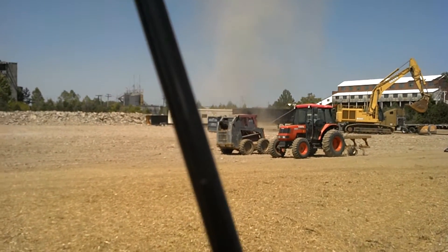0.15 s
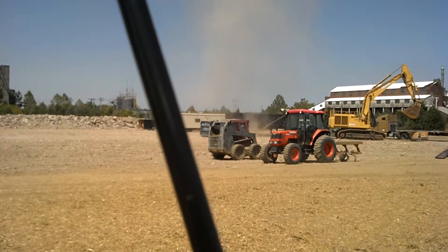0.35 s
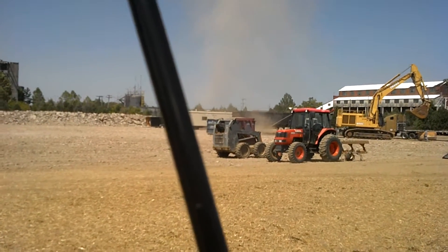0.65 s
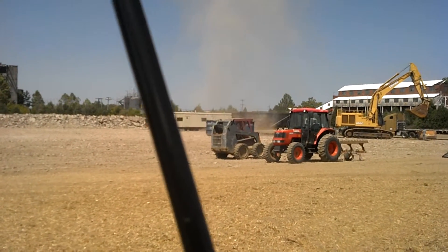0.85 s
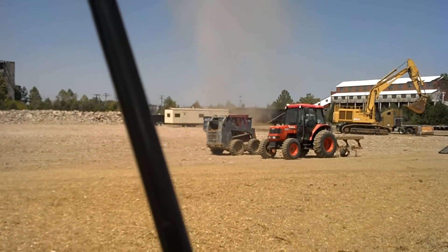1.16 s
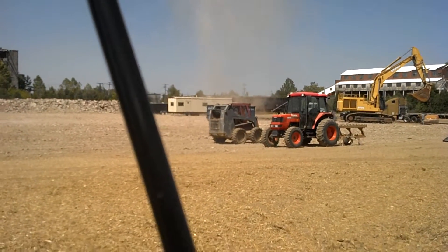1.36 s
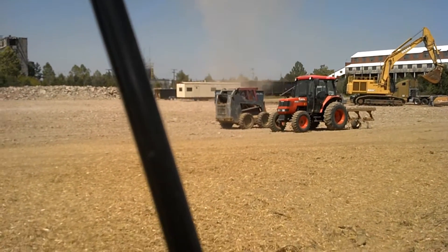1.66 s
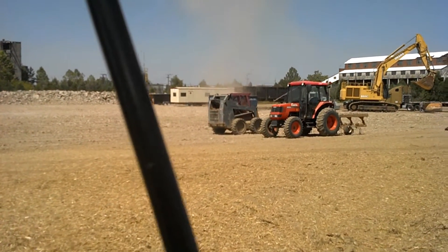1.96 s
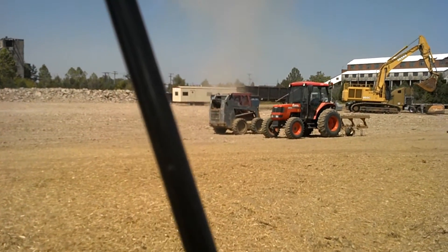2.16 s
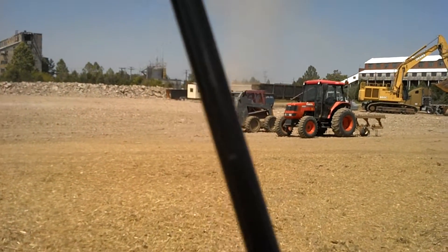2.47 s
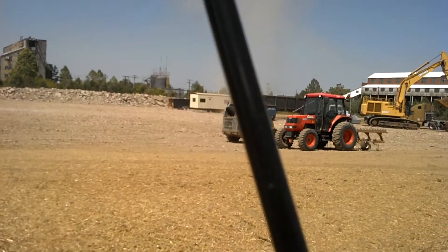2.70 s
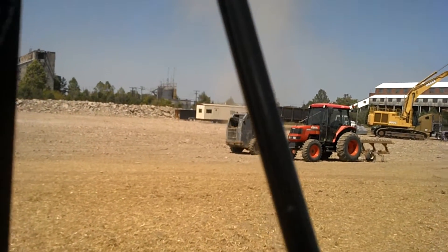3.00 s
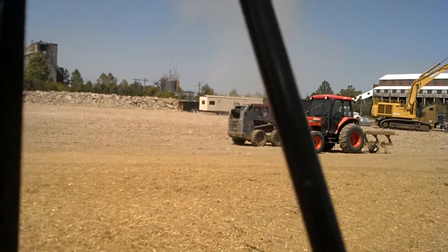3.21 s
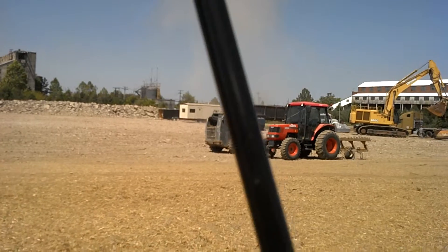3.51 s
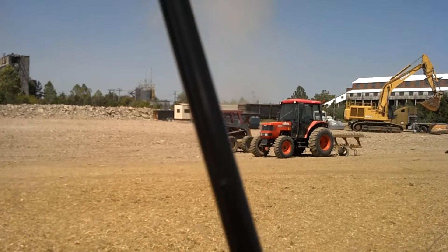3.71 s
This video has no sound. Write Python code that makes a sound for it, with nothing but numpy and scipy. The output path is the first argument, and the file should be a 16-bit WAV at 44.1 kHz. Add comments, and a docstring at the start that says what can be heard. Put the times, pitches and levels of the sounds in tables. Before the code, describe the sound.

A heavy machine's engine runs close by on the left, its hum, low throb and broad roar growing louder over the first two seconds, then holding. From about 1.5 seconds a hiss swells and sinks over a light rattle and a faint distant drone. Wind thumps the microphone a few times, hardest near 1.7 seconds. A second machine whines up and down on the right, clearest from 2.3 to 3.5 seconds.

```python
"""Engine on a dusty lot

An engine fades up close by on the left of an open lot: a clean hum and a low throb over a broad roar.
Its hiss swells and sinks with the load; its treble is flipped and slightly late on the right.
A steady drone sounds far off, a second machine whines up and down on the right,
and wind thumps the microphone."""
import sys
import numpy as np
from scipy import signal
from scipy.fft import rfft, irfft, next_fast_len
from scipy.io import wavfile
from scipy.ndimage import uniform_filter1d, map_coordinates

SR = 44100
rng = np.random.default_rng(int(sys.argv[2]) if len(sys.argv) > 2 else 0)


def file_out(sig):
    """Save sig as 16-bit WAV at sys.argv[1]."""
    # one column per channel
    cols = np.atleast_2d(sig).T
    # limit, then scale
    lim = np.clip(cols, -1, 1)
    pcm = np.round(lim * 32767).astype(np.int16)
    wavfile.write(sys.argv[1], SR, pcm)


N = 169785

# How the engine's noises swell: (time [s], roar gain [dB], bass gain [dB], hiss gain [dB])
ENGINE_GAINS = [(0, -50, -50, -66), (.3, -47, -44, -67.5), (.7, -44, -41.5, -60.5),
                (.95, -41, -44.5, -61.5), (1.2, -38.5, -35.5, -57.5), (1.47, -37, -40, -54),
                (1.58, -35.5, -34, -46), (1.74, -35.5, -33.5, -47.5), (2.08, -31.5, -36.5, -41.5),
                (2.18, -33.5, -30, -44), (2.3, -32.5, -34, -41), (2.56, -33, -33, -40.5),
                (2.66, -34.5, -33.5, -44.5), (3.05, -32.5, -36.5, -40.5), (3.2, -33, -32, -44),
                (3.28, -36.5, -35, -47), (3.42, -32.5, -31, -47.5), (3.56, -35, -36.5, -51),
                (3.63, -33, -38, -47), (3.75, -33.5, -33, -46), (3.82, -33, -33, -40.5)]
# The engine's note: (time [s], pitch [Hz], left level [dB], left level an octave up [dB])
ENGINE_NOTE = [(0, 235.5, -44, -48), (.15, 238.8, -37, -48.5), (.35, 236.4, -36.5, -46),
               (.75, 236, -35, -46.5), (1.05, 238.2, -29.5, -41.5), (1.35, 238.6, -28, -37.5),
               (1.55, 236.9, -23, -36), (1.73, 234, -40, -43), (1.9, 233.2, -21.5, -42),
               (2.05, 234.7, -29.5, -36.5), (2.35, 235.7, -24.5, -31), (2.47, 234.3, -31, -33),
               (2.65, 233.7, -42, -44), (2.78, 233.7, -30, -41.5), (3.1, 235.5, -23, -37.5),
               (3.25, 236.4, -25.5, -39.5), (3.45, 237.2, -29, -32.5), (3.64, 236.7, -33.5, -36.5),
               (3.75, 236.7, -21, -45), (3.85, 234, -35, -51)]


def amp(db):
    return 10 ** (np.asarray(db) / 20)


def unit_rms(x):
    return x / np.sqrt(np.mean(x ** 2) + 1e-20)


def over_frequency(rows, hz):
    """Join a table's rows into curves along a log frequency axis."""
    row_hz, *columns = np.transpose(rows)
    return [np.interp(np.log(hz + 1), np.log(row_hz + 1), c) for c in columns]


def over_time(rows):
    """Join a table's rows into curves with one value per sample."""
    times, *columns = np.transpose(rows)
    return [np.interp(np.arange(N) / SR, times, c) for c in columns]


def wobble(rate):
    """A smooth curve through `rate` random points a second."""
    return map_coordinates(rng.standard_normal(int(N * rate / SR) + 4), [np.arange(N) * rate / SR])


def noise_pair(patchy_db):
    """Spectra of two noises with the same loud and soft patches, and their frequencies."""
    cells = signal.stft(rng.standard_normal((2, N)), nperseg=512)[2]
    patches = uniform_filter1d(rng.standard_normal(cells.shape[1:]), size=8, axis=0)
    patches = uniform_filter1d(patches, size=12, axis=1)
    pair = signal.istft(cells * amp(patchy_db * unit_rms(patches)), nperseg=512)[1][:, :N]
    return *rfft(pair), np.fft.rfftfreq(N, 1 / SR)


def tone(hz, waver_db, rate=12):
    """A pure tone that follows a pitch curve and wavers in level."""
    cycles = np.cumsum(hz) / SR
    return np.sqrt(2) * amp(waver_db * wobble(rate)) * np.sin(2 * np.pi * (cycles + rng.random()))


def wide_noise(spectrum, patchy_db, late_s=17 / SR, alike_top_hz=14970):
    """Noise as if flipped and late on the right: its bands are by turns alike and opposite."""
    # How bands take turns: (frequency [Hz], firmness, hand-over exponent, link between the parts [0-1])
    band_turns = [(1500, 1.07, 0.11, 0.1), (2120, 1.253, 0.37, 0), (2615, 1.03, 0.42, .2),
                  (3080, 1.38, 0.12, 0.5), (4300, 1.11, 1, 0.5), (6800, 1.32, 0.24, .3),
                  (15000, 1.29, 0.27, .3)]
    a, b, hz = noise_pair(patchy_db)
    lag = 2 * np.pi * hz * late_s
    firmness, handover, link = over_frequency(band_turns, hz)
    share = np.clip(.5 - firmness * np.cos(lag) / 2, 0, 1) * (hz < alike_top_hz)
    alike, opposite = share ** handover, (1 - share) ** handover
    gain = amp(over_frequency(spectrum, hz)[0]) / np.hypot(alike, opposite)
    mid = alike * a
    side = opposite * (-1j * np.sign(np.sin(lag)) * link * a + np.sqrt(1 - link ** 2) * b)
    return unit_rms(irfft(gain * np.array([mid + side, mid - side]), N))


def hum(hz, hum_db, octave_db):
    """The engine's clean note and its octave, mostly on the left."""
    note = amp(hum_db) * tone(hz, waver_db=1.5, rate=20) * [[1], [-amp(-19)]]
    octave = amp(octave_db) * tone(2 * hz, waver_db=1.5) * [[1], [amp(-12.5)]]
    return note + octave


def engine_orders(cycle_hz):
    """Fainter tones at whole multiples of the rate at which the engine repeats its cycle."""
    # The tones: (multiple, left gain [dB], right gain [dB], waver [dB])
    orders = [(15, -9, -22, 2.5), (18, -31, -32, 3), (20, -17, -34, 6), (21, -18.5, -27, -3),
              (30, -16, -18.5, 2), (36, -14.5, -28, 2.5)]
    return sum(amp([[left], [right]]) * tone(k * cycle_hz, waver) for k, left, right, waver in orders)


def far_drone(hz=200.5):
    """A distant tone that holds nearly one pitch."""
    return amp([[-12], [-9]]) * tone(hz + 0.59 * wobble(4.6), waver_db=2.5)


def throb(cycle_hz):
    """A low tone at eight times the engine's cycle rate, coming in uneven surges."""
    # The surges: (time [s], gain [dB])
    surges = [(0.0, -48), (0.17, -65), (0.39, -42.5), (0.59, -47.5), (0.67, -33), (0.74, -56), (0.87, -40),
              (1.16, -47), (1.31, -35), (1.34, -49), (1.5, -33), (1.88, -40), (1.91, -54), (2.05, -34),
              (2.09, -45), (2.14, -32), (2.41, -39.5), (2.58, -31.5), (2.63, -42), (2.85, -32.5),
              (2.89, -46), (3.11, -26), (3.18, -38.5), (3.59, -31), (3.74, -42), (3.81, -30.5), (3.85, -47)]
    return amp(over_time(surges)[0]) * amp([[.5], [-4.5]]) * tone(8 * cycle_hz, waver_db=3, rate=24)


def roar(roar_db, bass_db, split_hz=186, gain_db=1.5):
    """The engine's broad, low noise: the bass shakes and the upper part flutters lightly."""
    # Tone colour: (frequency [Hz], left gain [dB], right gain [dB], likeness [0-1], right lead [rad])
    spectrum = [(20, -81, -83, .85, 3), (40, -70, -73, .85, 2.9), (62, -63, -67, .85, 2.8),
                (85, -54, -59, .75, 2.6), (125, -54, -56, .6, 2.8), (140, -53, -56, .6, 2),
                (156, -50, -53, .75, 1), (185, -53, -59, .3, 1.5), (212, -57, -57, .3, 1.5),
                (270, -55, -53, .3, 2), (305, -58, -55, .4, 1.2), (340, -62, -55, .3, .3),
                (420, -59, -57, .4, 0), (560, -65, -62, .45, -.4), (680, -65.5, -64, .45, -.2),
                (850, -70.5, -66, .45, 0), (1020, -72, -68, .6, .1), (1120, -79, -76, .6, 0),
                (1210, -130, -130, 1, 0)]
    a, b, hz = noise_pair(patchy_db=-0.5)
    left_db, right_db, alike, lead = over_frequency(spectrum, hz)
    right = alike * np.exp(1j * lead) * a + np.sqrt(1 - alike ** 2) * b
    pair = np.array([amp(left_db) * a, amp(right_db) * right])
    low_pass = 1 / (1 + (hz / split_hz) ** 4)
    bass, upper = amp(gain_db) * unit_rms(irfft(np.array([pair * low_pass, pair * (1 - low_pass)]), N))
    return amp(roar_db + 0.68 * wobble(24.01)) * upper + amp(bass_db + 2 * wobble(23)) * bass


def rattle():
    """The engine's rattle: patchy noise, strongest from 1 to 2 kHz."""
    # Tone colour: (frequency [Hz], gain [dB])
    spectrum = [(850, -130), (1050, -74.5), (1250, -74.5), (1450, -77.5), (1620, -73.5), (1850, -78),
                (2150, -76), (2400, -79), (2650, -81.5), (3700, -82.5), (6500, -89), (16000, -110)]
    return amp(-7.5 + 0.65 * wobble(6.9)) * wide_noise(spectrum, patchy_db=1.5)


def hiss(load_db):
    """High, flickering noise that swells and sinks with the engine's load."""
    # Tone colour: (frequency [Hz], gain [dB])
    spectrum = [(900, -130), (1500, -30), (2900, 2.5), (3700, 0), (4200, -7.5), (5300, -5), (6200, 0),
                (10000, -0.5), (13000, -1.5), (15700, -0.5)]
    flicker_db = 0.4 * wobble(12) + 0.84 * wobble(40)
    return amp(load_db + 5.5 + flicker_db) * wide_noise(spectrum, patchy_db=1.36)


def second_machine():
    """A whine: one gliding tone, mostly on the right."""
    # The glide: (time [s], pitch [Hz], right level [dB])
    glide = [(0, 245, -63), (.3, 252, -57), (.48, 261, -44), (.7, 245, -48), (.9, 235, -44),
             (1.9, 220, -41), (2.1, 228, -71), (2.3, 246, -25.5), (2.5, 263, -35.5), (2.9, 255, -33),
             (3.2, 248, -37), (3.45, 233, -37), (3.7, 225, -69)]
    hz, level_db = over_time(glide)
    return amp(level_db) * tone(hz, waver_db=-3) * amp([[-26], [0]])


def wind_thumps(end_hz=105, fall_s=0.0063, rise_s=0.0023, fade_60db_s=0.047):
    """Wind hits the microphone: a few low waves falling in pitch, opposite on the two sides."""
    # The thumps: (time [s], gain [dB], starting pitch [Hz])
    thumps = [(0.107, -26, 150), (0.681, -16, 218.5), (1.673, -2, 219.8), (3.74, -21, 150.4)]
    out, t = np.zeros(N + SR), np.arange(SR // 5) / SR
    for start_s, db, start_hz in thumps:
        hz = end_hz + (start_hz - end_hz) * np.exp(-t / fall_s)
        envelope = amp(db - 60 * t / fade_60db_s) * (1 - np.exp(-t / rise_s))
        out[round(start_s * SR):][:len(t)] += envelope * np.sin(2 * np.pi * np.cumsum(hz) / SR)
    return out[:N] * [[-amp(-3)], [1]]


def scene():
    """Add up all the sounds as a left and a right channel."""
    roar_db, bass_db, hiss_db = over_time(ENGINE_GAINS)
    hum_hz, hum_db, octave_db = over_time(ENGINE_NOTE)
    cycle_hz = hum_hz / 12  # the hum vibrates 12 times per engine cycle
    tones = hum(hum_hz, hum_db, octave_db)
    tones += amp(roar_db) * (engine_orders(cycle_hz) + far_drone()) + throb(cycle_hz)
    noises = roar(roar_db, bass_db) + amp(roar_db) * rattle() + hiss(hiss_db)
    return tones + noises + second_machine() + wind_thumps()


def record(dry, top_hz=15750):
    """Cut away the very highest treble."""
    size = next_fast_len(N + SR // 4)
    return irfft(rfft(dry, size) * (np.fft.rfftfreq(size, 1 / SR) < top_hz), size)[:, :N]


dry = scene()
out = record(dry)
file_out(out)
```